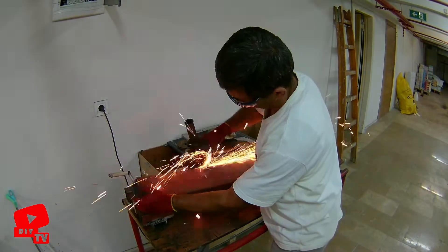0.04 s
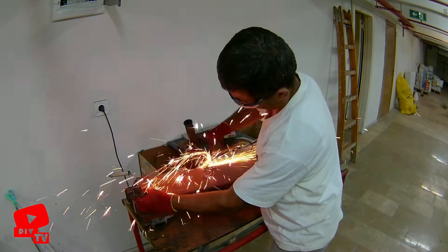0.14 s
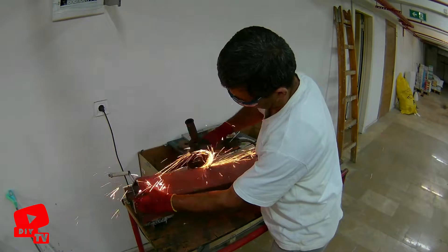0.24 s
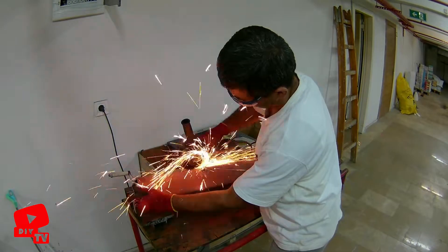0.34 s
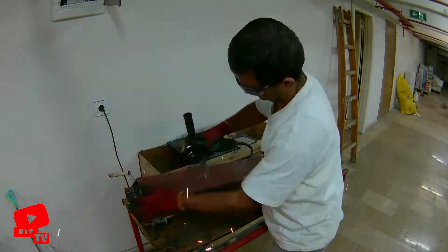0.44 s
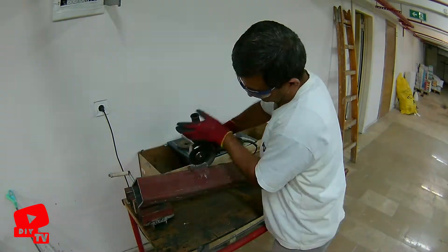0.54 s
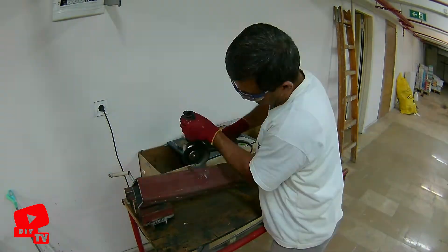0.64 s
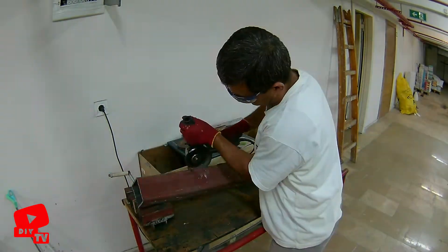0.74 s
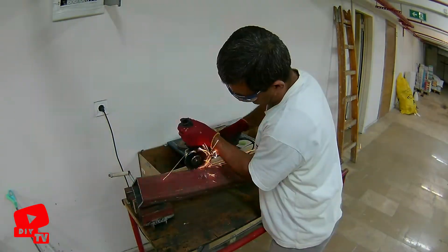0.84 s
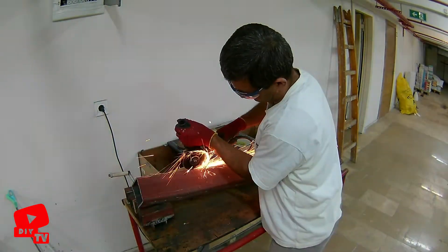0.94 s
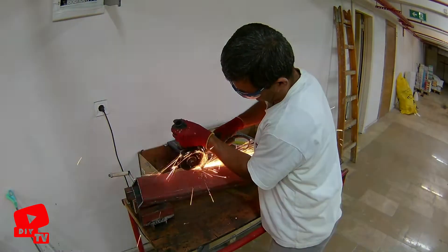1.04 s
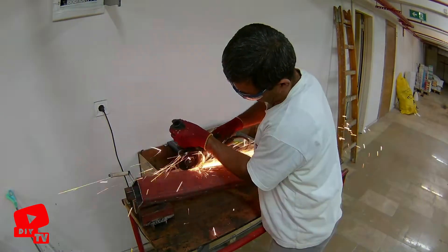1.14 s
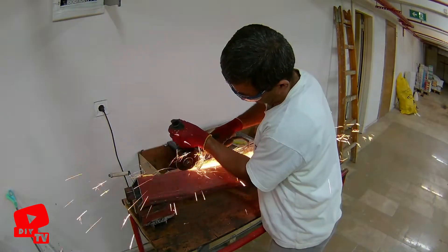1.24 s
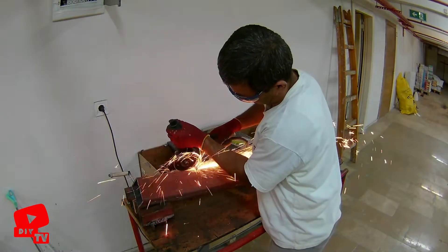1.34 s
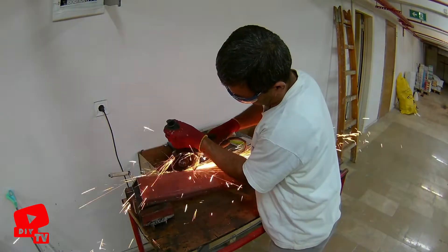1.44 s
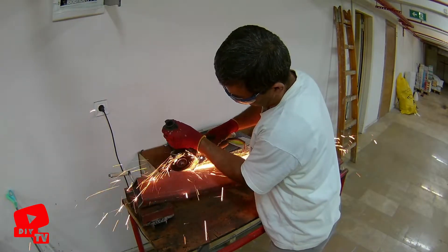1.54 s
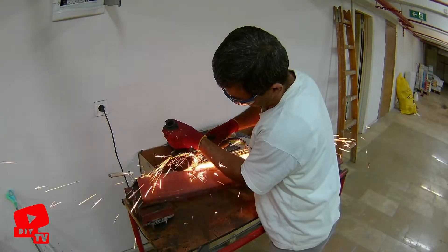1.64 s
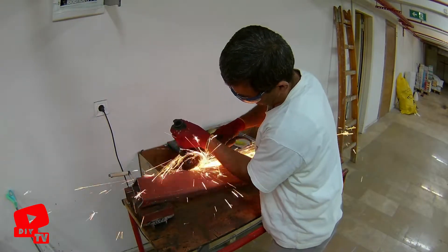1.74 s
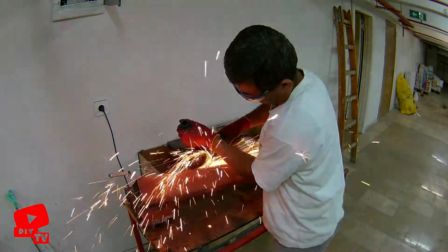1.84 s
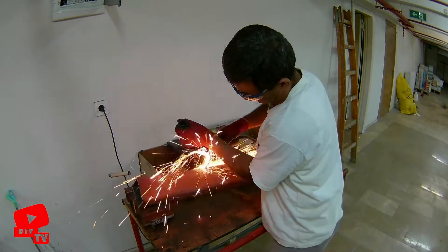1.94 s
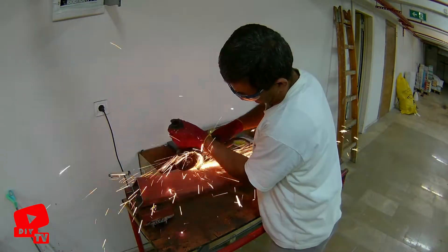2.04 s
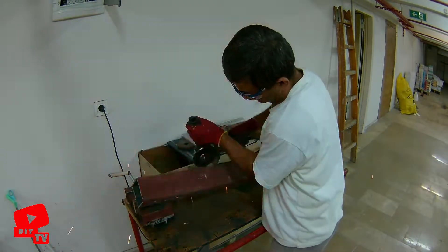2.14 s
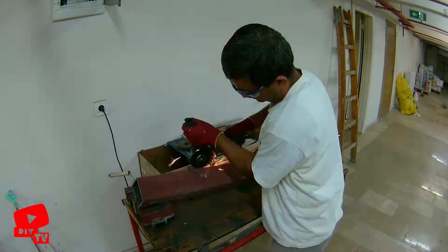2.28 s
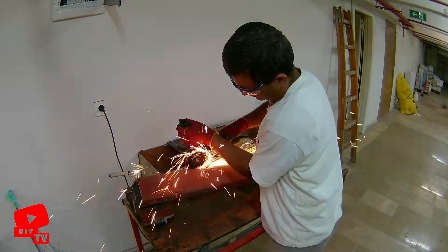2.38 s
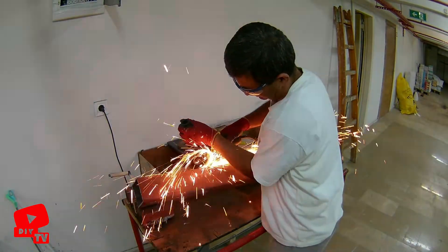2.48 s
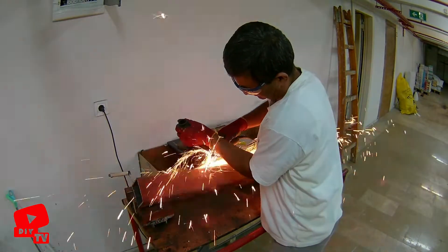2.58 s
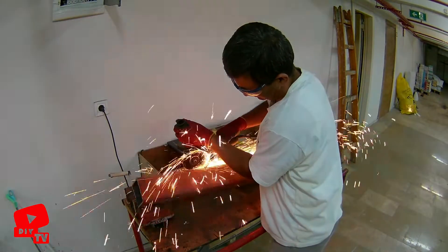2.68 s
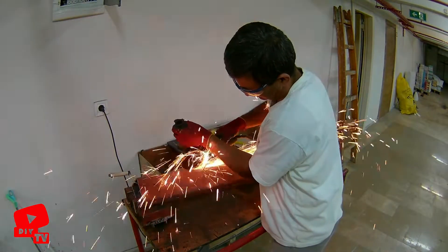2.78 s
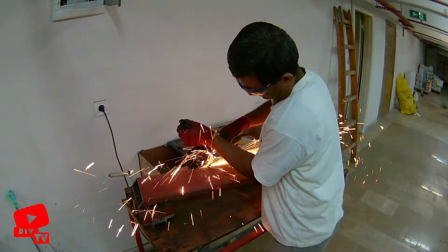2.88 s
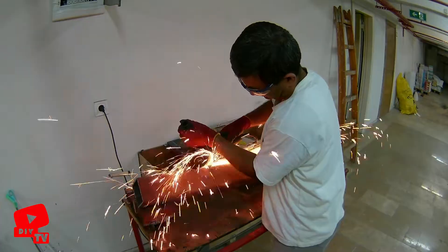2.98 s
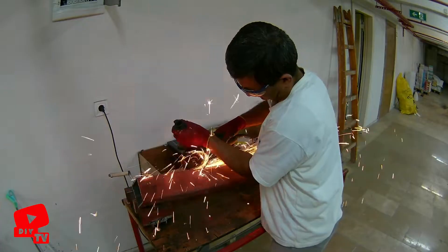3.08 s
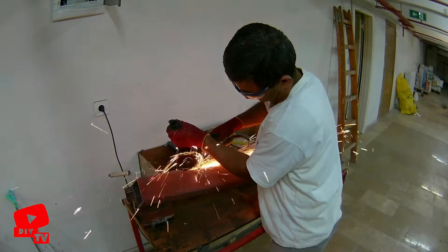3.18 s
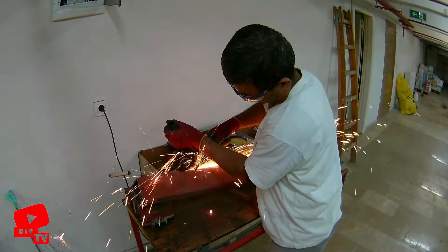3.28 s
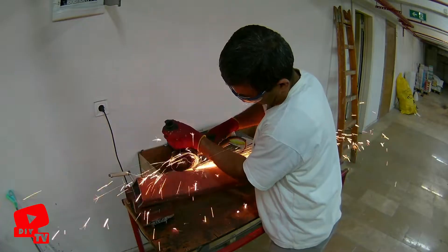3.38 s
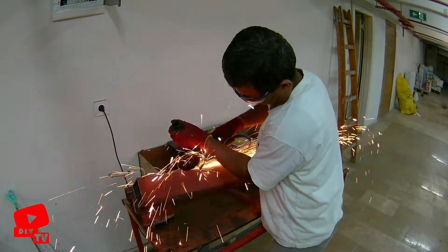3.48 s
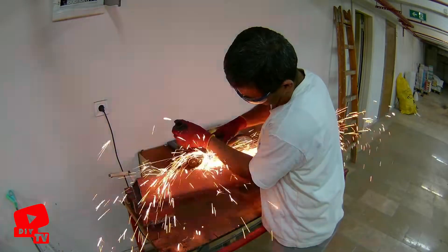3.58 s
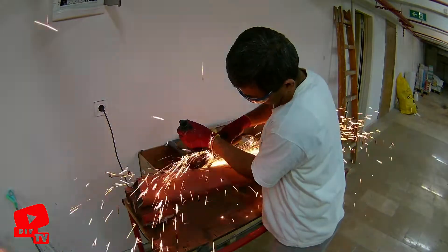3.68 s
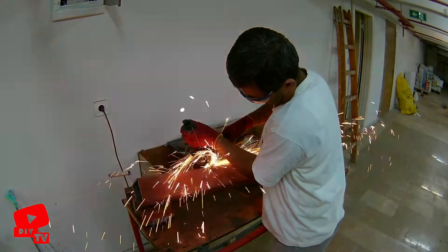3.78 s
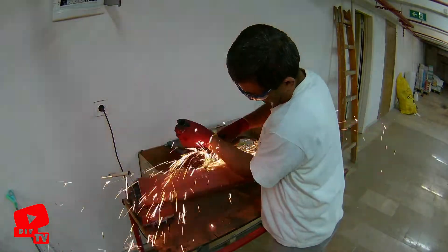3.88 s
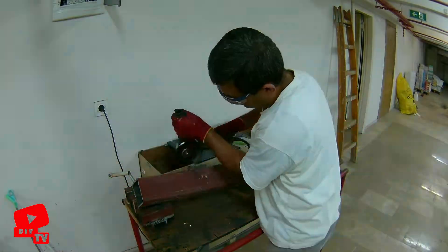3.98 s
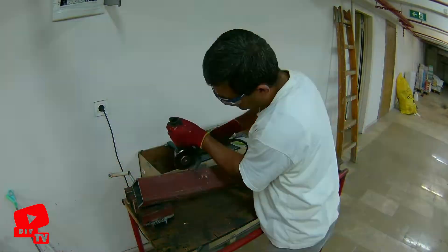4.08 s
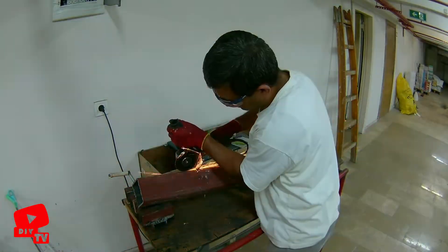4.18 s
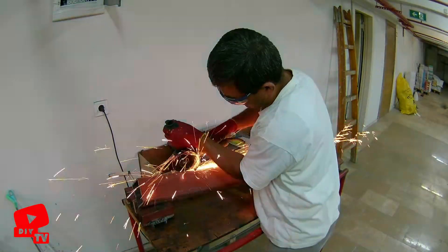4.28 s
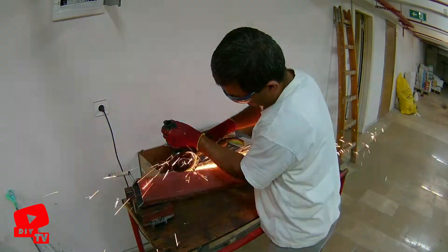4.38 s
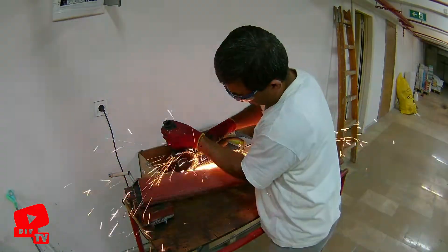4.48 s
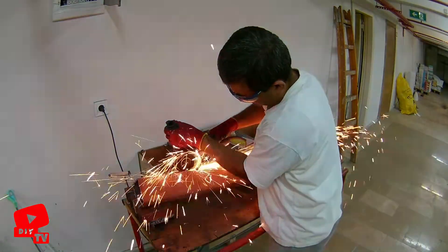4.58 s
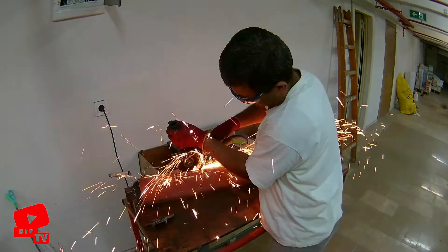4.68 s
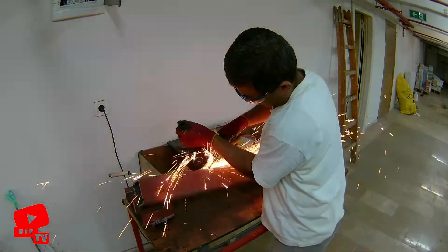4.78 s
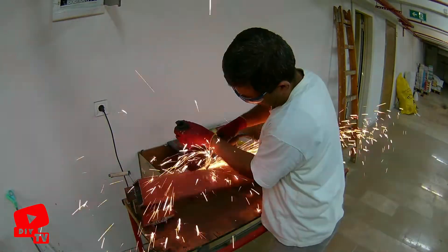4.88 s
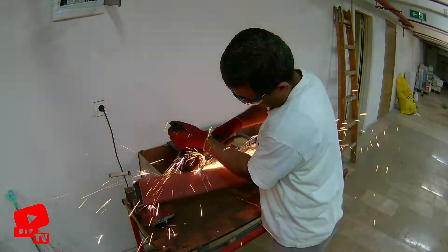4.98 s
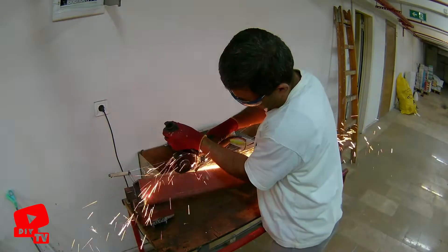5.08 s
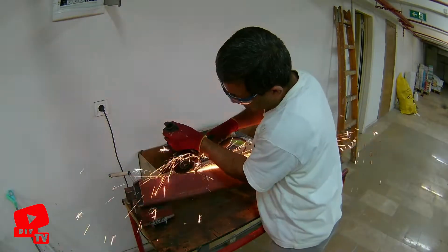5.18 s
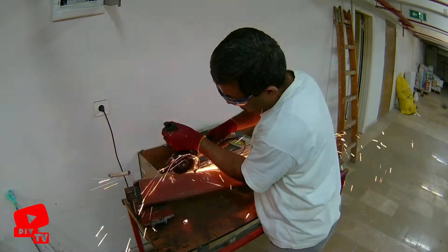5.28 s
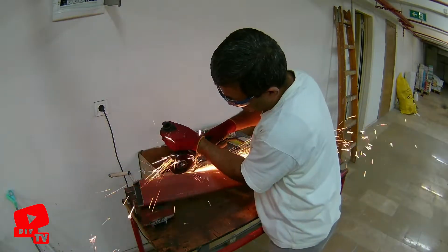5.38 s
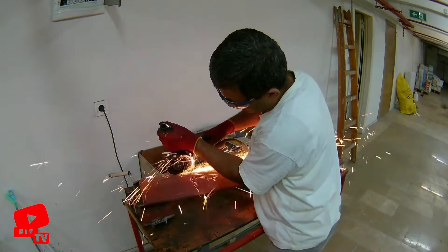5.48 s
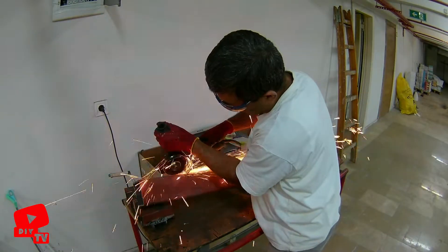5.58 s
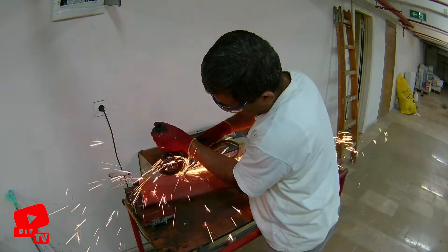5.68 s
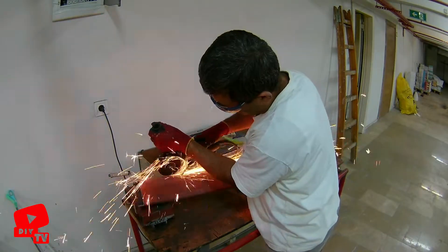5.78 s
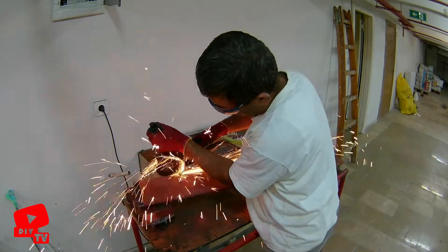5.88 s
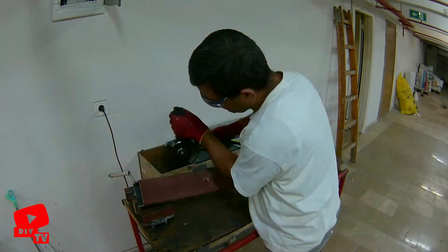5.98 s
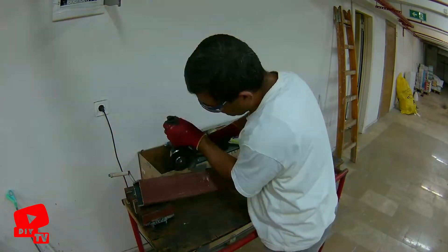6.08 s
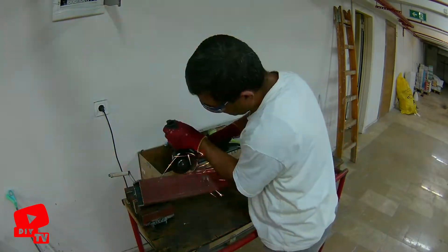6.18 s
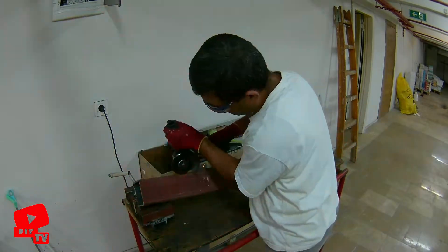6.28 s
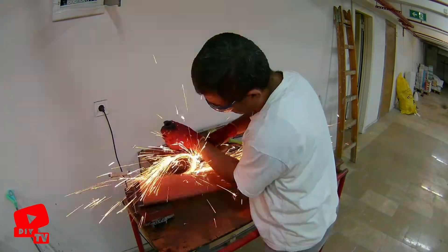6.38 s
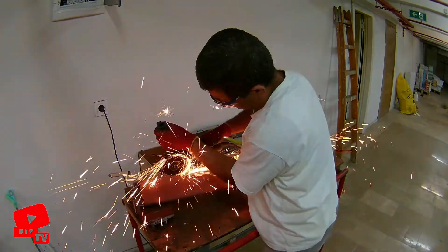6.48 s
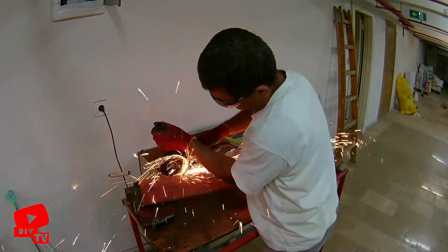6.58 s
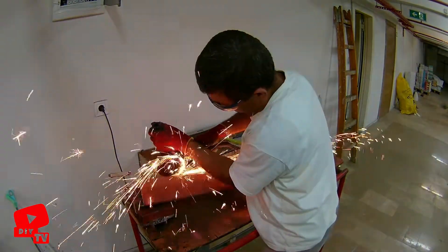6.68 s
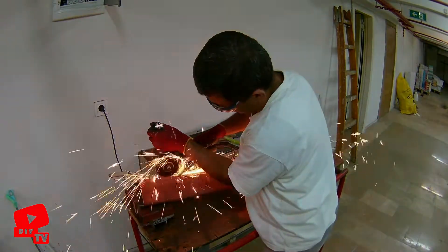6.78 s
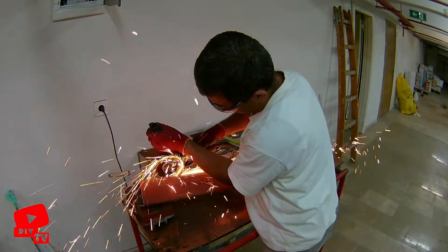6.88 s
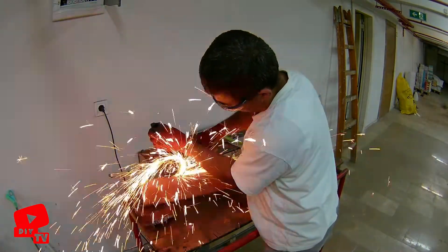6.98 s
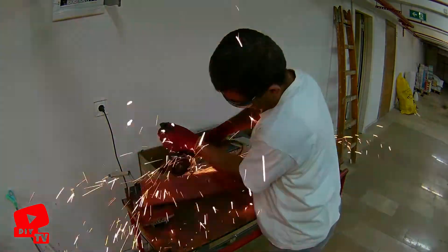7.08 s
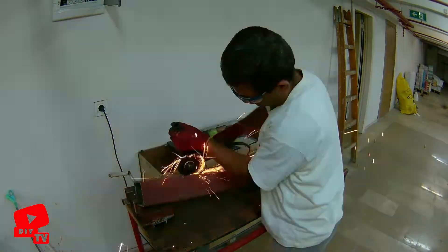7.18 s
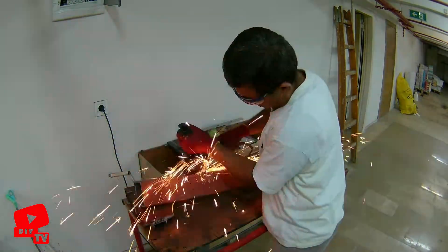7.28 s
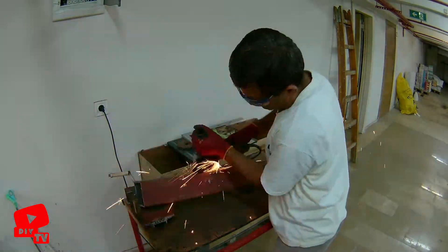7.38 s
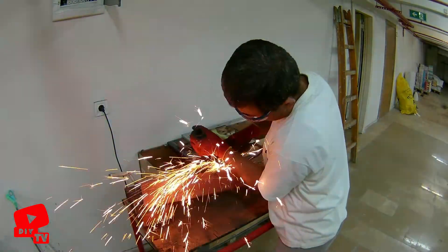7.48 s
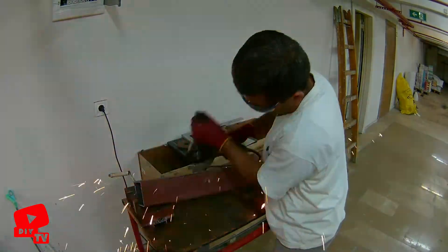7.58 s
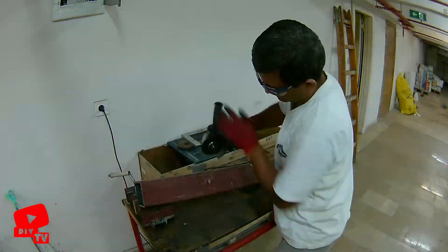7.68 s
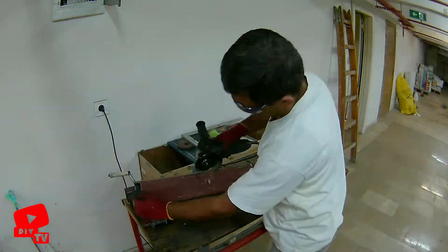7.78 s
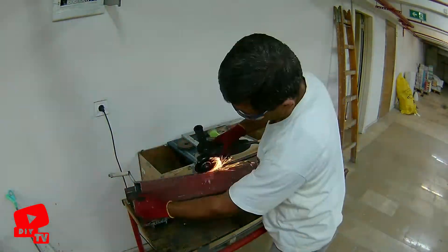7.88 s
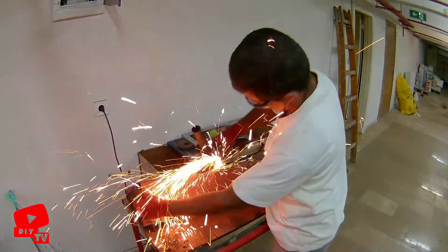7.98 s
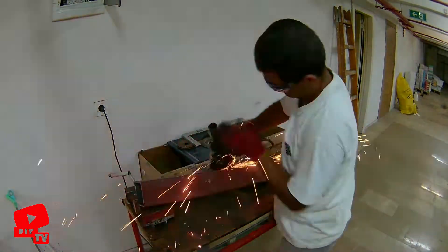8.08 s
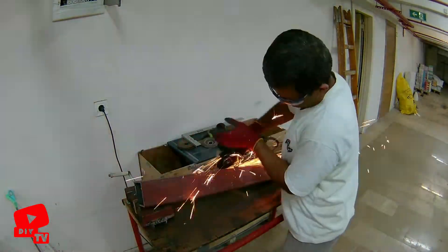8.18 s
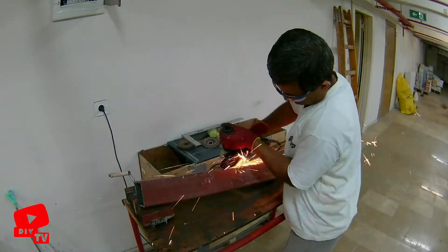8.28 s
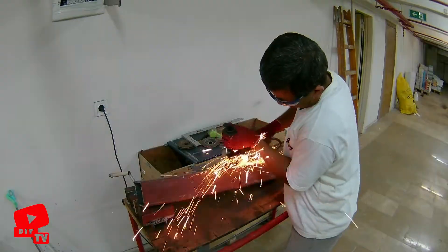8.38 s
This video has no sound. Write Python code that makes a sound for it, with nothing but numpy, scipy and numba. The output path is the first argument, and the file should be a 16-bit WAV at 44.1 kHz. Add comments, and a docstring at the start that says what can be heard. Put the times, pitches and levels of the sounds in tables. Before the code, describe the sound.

An angle grinder bites a steel tube in six quick close passes, harsh buzzing rasp and squeal, whirring up freely between bites in a workshop.

```python
"""Angle grinder on a steel tube

An angle grinder bites into a steel tube in six quick passes, close by in a workshop.
The spindle whirrs up when free and drags down under load. The worn rim repeats every turn (a periodic
source: a buzzing stack of lines), loose grit adds a noisy rasp, and both excite resonances of disc and tube.
Cooling air and a bearing whine fill the pauses, over a faint hum, a low drone and a short room echo."""
import sys
import numpy as np
from scipy import signal
from scipy.fft import rfft, irfft, next_fast_len
from scipy.io import wavfile
from scipy.ndimage import uniform_filter1d, map_coordinates
from numba import njit

SR = 44100
rng = np.random.default_rng(int(sys.argv[2]) if len(sys.argv) > 2 else 0)


def transcribe(signal):
    """Save signal, clipped to [-1, 1], as a 16-bit WAV file at the path in sys.argv[1]."""
    frames = np.atleast_2d(signal).T
    limited = np.clip(frames, -1, 1)
    pcm = np.round(limited * 32767).astype(np.int16)
    wavfile.write(sys.argv[1], SR, pcm)


N = 372204
TIME = np.arange(N) / SR  # s

# Electric hum. Each row: frequency in Hz, mean level in dB.
HUM = [(166.9, -80), (333.8, -86)]
# Low resonances that swell and fade. Each row: frequency in Hz, width in Hz, level in dB.
DRONE = [(241, 22, -83.5), (316, 36, -79.5)]
# Relative spectrum of the cooling air. Each row: frequency in Hz, density in dB per Hz.
AIR_SPECTRUM = [(30, -27), (100, -22.5), (200, -22), (400, -22.5), (900, -25.5), (1400, -19.5), (2200, -12),
                (3400, -2.5), (4600, -6), (6600, 1), (9800, -0.5), (12500, -5), (15500, -2)]
# Pressure on the disc, one curve a pass. Each row: time in s, loss of spindle speed in Hz before inertia.
DRAG = [
    [(0.0, 175.2), (0.128, 205.3), (0.163, 146.5), (0.303, 165.3), (0.432, 226)],
    [(0.87, 28.54), (1.015, 161.3), (1.173, 196.1), (1.731, 207.3), (1.986, 256.8), (2.08, 228.8),
     (2.145, 204)],
    [(2.329, 195), (2.393, 269), (2.529, 293), (2.723, 248.2), (2.852, 188.9), (2.95, 314.4),
     (3.094, 173.3), (3.222, 260), (3.408, 255.7), (3.724, 287), (3.812, 222.8), (3.929, 242.5)],
    [(4.237, 82.9), (4.318, 275.5), (4.465, 236.3), (4.66, 275.1), (4.766, 163.3), (4.858, 256.3),
     (4.997, 243), (5.094, 294.8), (5.307, 177.1), (5.485, 219.4), (5.963, 227.2)],
    [(6.36, 68.3), (6.433, 291.3), (6.6, 216.8), (6.746, 268.4), (7.071, 271.6), (7.152, 211),
     (7.189, 247.2), (7.21, 30.05), (7.46, 83.8), (7.505, 288.1), (7.61, 164.3)],
    [(7.906, 62.1), (7.933, 240.3), (8.152, 124), (8.32, 150.4), (8.44, 298.5)],
]
# Contacts of disc and steel. Each row: start in s, end in s, then in dB the repeating rim over loose grit,
# growl, tube ring, sizzle and knock; each dB value is added to other settings.
PASSES = [(-0.05, 0.418, -5.5, -3, 1, 9.5, 1.5), (0.864, 2.117, -1.5, -16, -2.5, 8, -1),
          (2.308, 3.904, 1, 4.5, 0.5, 7, -1.5), (4.227, 5.927, 1.5, 0.5, 0.5, 7.5, 0),
          (6.34, 7.585, 0, -10, 1, 6.5, 1), (7.905, 8.502, -0.5, -5, 4, 6, 10.5)]
# The rim skims the steel just before a pass. Each row: start in s, end in s, dB against the coming bite.
GRAZES = [(6.244, 6.29, -3.5), (7.851, 7.869, -7)]
# Brief dropouts of the rasp while a few tones carry on. Each row: centre in s, half length in s,
# depth of the hiss in dB, depth of the buzz in dB.
LULLS = [(.897, .014, 12, 7), (1.177, .013, 15, 9), (1.335, .013, 14, 8), (2.15, .012, 9, 4),
         (2.394, .016, 34, 28), (2.5, .01, 8, 0), (3.937, .01, 9, 4), (4.333, .012, 9, 2),
         (4.473, .014, 12, 3), (4.95, .018, 32, 14), (5.76, .015, 34, 10), (6.168, .011, 6, 2),
         (7.025, .013, 13, 4), (7.35, .009, 11, 4), (7.635, .015, 12, 7)]
# Once-a-turn throb, one curve a pass. Each row: time in s, level in dB before THROB_TRIM_DB and contact.
THROB = [
    [(0.0, -59), (0.204, -62), (0.236, -68), (0.378, -53.5), (0.684, -70), (0.8, -63)],
    [(0.92, -64), (0.982, -62), (1.7, -65), (1.898, -69), (1.98, -56), (2.05, -70)],
    [(2.42, -62.5), (2.756, -73), (2.876, -52), (3.072, -64), (3.106, -53.5), (3.808, -71), (3.846, -62),
     (3.95, -64)],
    [(4.1, -66), (4.234, -57), (4.516, -53.5), (4.73, -77), (4.854, -50), (5.208, -68), (5.324, -54),
     (5.97, -64)],
    [(6.2, -75), (6.248, -52), (6.3, -74), (6.404, -56), (7.002, -67), (7.39, -58), (7.456, -47),
     (7.65, -69)],
    [(7.92, -62), (7.938, -55), (7.974, -53), (8.002, -65), (8.028, -52.5), (8.242, -58), (8.318, -62),
     (8.35, -89)],
]
# Coarse bursts as the rim snags. Each row: centre in s, half length in s, peak level in dB.
SNAGS = [(3.529, 0.02, -38), (5.213, 0.095, -41.5), (6.435, 0.011, -43), (6.957, 0.034, -44),
         (7.323, 0.024, -41), (7.557, 0.027, -42)]
# Single modes that catch and flare. Each row: centre in s, half length in s, frequency in Hz, level in dB.
SCREAMS = [(0.12, 0.062, 1212, -48.5), (0.152, 0.028, 1584, -42), (0.335, 0.041, 1590, -46),
           (0.337, 0.023, 6400, -38), (0.354, 0.033, 5180, -36), (1.005, 0.014, 5420, -39),
           (1.05, 0.031, 1216, -48), (1.408, 0.17, 11320, -30.5), (1.5, 0.099, 1847, -45.5),
           (1.605, 0.19, 6500, -41.5), (1.722, 0.034, 11320, -23.5), (1.793, 0.0095, 8268, -26),
           (1.966, 0.069, 5500, -35), (1.968, .07, 3180, -48), (1.7, .05, 3943, -47),
           (1.996, 0.12, 4590, -43), (2.03, 0.057, 10335, -38), (2.39, 0.016, 8120, -25),
           (2.391, 0.017, 12070, -27), (2.455, 0.029, 6440, -35.5), (2.484, 0.012, 4560, -30),
           (2.627, 0.11, 1650, -42), (2.804, 0.021, 4627, -37), (2.99, .025, 5624, -34),
           (3.362, 0.057, 3591, -42), (3.6, 0.035, 3877, -39), (3.669, 0.14, 1624, -43),
           (3.718, 0.025, 4640, -31.5), (4.705, 0.032, 1218, -39.5), (4.968, 0.015, 2730, -38),
           (4.952, .018, 3630, -37.5), (4.969, 0.019, 1345, -40), (4.95, 0.028, 898, -45),
           (4.951, 0.023, 4630, -36), (4.952, 0.021, 11540, -27), (4.954, 0.014, 7770, -32),
           (4.99, 0.034, 6350, -26), (5.19, 0.05, 1718, -42), (5.21, 0.053, 887, -46),
           (5.194, 0.026, 3050, -37.5), (5.299, 0.048, 2304, -41), (5.763, 0.014, 4230, -39),
           (5.745, 0.011, 1830, -39), (5.739, 0.012, 3050, -41), (5.84, 0.055, 5230, -40.5),
           (5.624, .03, 3865, -40.5), (6.802, 0.065, 881, -47.5), (6.984, 0.022, 3830, -38.5),
           (7.02, 0.02, 6380, -37), (7.148, .01, 4640, -37), (7.23, 0.015, 6310, -36),
           (7.132, 0.016, 914.5, -43.5), (7.155, 0.012, 2290, -33.5), (7.188, 0.048, 1845, -39),
           (7.331, 0.035, 1210, -43), (7.552, 0.016, 2300, -40), (8.055, .035, 6348, -32),
           (8.238, 0.03, 6290, -34), (8.242, 0.029, 4580, -34)]
# Guard and bench resonances for the knock. Each row: frequency in Hz, width in Hz, dB against the rasp.
BODY = [(497, 51, -10), (646, 56, -8), (878.5, 83, -6), (1323, 143.4, -14)]
# The tube's strongest modes. Each row: frequency at time zero in Hz, width in Hz, dB against the rasp,
# steady fall of frequency in Hz per s.
SINGING = [(1216, 21, -8, 0.5), (1614, 59, -12.5, -1), (1706, 23, -15.5, 2.5), (1856, 4.6, -8.5, 0),
           (2330, 52, -8, 1), (4615, 35, -4, 0.5), (6462, 44, 3.5, 18)]
# Lesser modes of the tube. Each row: frequency in Hz, width in Hz, relative level in dB.
TUBE = [(3075, 40, -3), (3595, 20, -4), (3865, 20, -4), (6663, 25, 6), (8500, 45, 4), (8857, 25, 2),
        (9658, 30, 1), (10349, 30, -2), (11047, 20, 0), (11325, 25, 6), (12020, 30, 1)]
# Band levels, one curve a pass. Each row: time in s, rasp near 3 kHz in dB, band of the lower disc
# resonance in dB, band of the upper one in dB.
BITE = [
    [(0.0, -43.5, -30.5, -28), (0.074, -42.5, -33.5, -29.5), (0.354, -46, -30.5, -27),
     (0.42, -43, -37, -29)],
    [(0.91, -45, -31.5, -32.5), (0.966, -44.5, -28, -34), (1.212, -42.5, -31.5, -25.5),
     (1.242, -43.5, -31.5, -36), (1.354, -44, -33.5, -29), (1.758, -43, -32, -25.5),
     (1.778, -45, -31.5, -28.5), (2.12, -43, -26.5, -26)],
    [(2.34, -45, -27.5, -26), (2.598, -40, -30, -30), (2.834, -42, -36, -35.5), (2.86, -43, -32.5, -26.5),
     (3.248, -42, -30, -32.5), (3.366, -42.5, -39, -34), (3.672, -40.5, -25.5, -28.5),
     (3.892, -44, -35.5, -30.5), (3.91, -40, -23, -25)],
    [(4.26, -42.5, -32, -30.5), (4.314, -41.5, -30, -28.5), (4.624, -43, -35, -36),
     (4.81, -41.5, -30.5, -27.5), (5.332, -43.5, -36.5, -35), (5.42, -44, -39, -30),
     (5.498, -41.5, -33.5, -28), (5.812, -43.5, -35, -33.5), (5.92, -43, -34, -31)],
    [(6.37, -45, -34.5, -32), (6.468, -42, -30.5, -27), (6.546, -45, -41, -27), (6.62, -43.5, -35, -30.5),
     (6.988, -43, -38.5, -38.5), (7.022, -43, -35, -32), (7.088, -44.5, -42, -28), (7.1, -39.5, -30, -28),
     (7.15, -40, -36, -30), (7.184, -46, -40, -35), (7.3, -40.5, -35, -29), (7.365, -42.5, -33, -29.5),
     (7.4, -45, -35, -39), (7.46, -45, -36, -31), (7.535, -43, -34, -25), (7.59, -42.5, -35, -28.5)],
    [(7.93, -42, -36.5, -29), (8.242, -42, -35.5, -32.5), (8.392, -48, -33, -27), (8.42, -46, -37, -31)],
]
# Disc resonances shift with the point of contact, one curve a pass.
# Each row: time in s, lower resonance in Hz, upper resonance in Hz.
CONTACT = [
    [(0.0, 8430, 11900), (0.2, 8070, 11600), (0.244, 8560, 12400), (0.43, 8100, 11500)],
    [(0.9, 7660, 11690), (0.95, 8180, 11530), (1.748, 8170, 11100), (1.866, 8530, 12600),
     (1.974, 8490, 12350), (2.068, 8230, 11100), (2.13, 8170, 11900)],
    [(2.33, 8700, 11800), (2.532, 8730, 12200), (2.87, 7800, 11300), (2.94, 8640, 12500),
     (3.108, 8053, 11340), (3.508, 8000, 11500), (3.92, 8724, 12880)],
    [(4.25, 7800, 11320), (4.366, 8450, 11790), (5.002, 8204, 11350), (5.134, 9030, 12900),
     (5.494, 7960, 11110), (5.93, 7920, 11160)],
    [(6.36, 8270, 11620), (6.728, 8270, 11280), (6.774, 8320, 12610), (7.326, 8560, 11800),
     (7.388, 7695, 11810), (7.502, 8960, 12570), (7.6, 8440, 12380)],
    [(7.92, 8210, 11720), (7.992, 8700, 12100), (8.194, 7780, 11960), (8.44, 8920, 12660)],
]
# Filter on the rim's lines, weakest near 1500 Hz. Each row: frequency in Hz, gain in dB.
RIM_FILTER = [(1340, -3), (1430, -6), (1500, -17), (1600, -4), (1750, -2), (2400, -3.5), (3500, -4.5),
              (4800, -6), (5400, -4), (6800, -1), (8000, 0)]
# Relative spectrum of the rasp. Each row: frequency in Hz, gain in dB.
RASP_SPECTRUM = [(100, -30), (380, -19), (700, -12.5), (1000, -7.5), (1130, -9), (1280, 2.5), (1400, 1.5),
                 (1500, -0.5), (1700, 1), (2050, 0.5), (2500, -0.5), (3100, 1.5), (3700, -1.5), (4500, 5.5),
                 (4900, 3), (5350, 6.5), (5900, 0.5), (7200, 4.5), (10000, 5.5), (13300, -2), (16000, -7)]

FREE_HZ, WORKING_HZ, INERTIA_S = 697, 460, 0.075  # unloaded speed, reference speed for the growl
ATTACK_S, RELEASE_S = 0.027, 0.021
AIR_DB = -39.5
BEARING_ORDER = 3.725  # whine cycles per turn
WHINE_DB, LOADED_WHINE_DB = -59.5, -70  # part that follows speed, at full speed; part that does not
HOUSING_HZ, HOUSING_DB = 1213, -63.5
THROB_TRIM_DB, FREE_THROB_DB = -0.5, -8  # the second applies off the steel
SNAG_HZ, SNAG_WIDTH_HZ = 1990, 1900
IDLE_KNOCK_DB = -56
RING_ON_S, SWELL_DB = 0.04, 4.2
FLASH_HZ, TOP_RATIO = 5400, 1.486  # lowest disc voice; top disc voice over the lower resonance
CROWD_DB = -9
RASP_DB, GROWL_DB, SIZZLE_DB, TUBE_DB = 13, -13, -6, 18.5
GROWL_GRIT_DB = -5
GROWL_DB_PER_HZ = -0.017  # the growl weakens with each turn per second lost
SKID_DB, SKID_S = 2, 0.53  # the repeating rim stands out most at the start of a pass
EVEN_DB_PER_DB = 1.02  # a disc that squeals over its rasp runs more evenly
TOP_HZ = 15750


def undb(db):
    """Amplitude is ten to the power of the decibels over twenty."""
    return 10 ** (np.asarray(db) / 20)


def curves(table):
    """Linear interpolation carries each column of timed rows to every sample."""
    seconds, *columns = np.transpose(table)
    return [np.interp(TIME, seconds, column) for column in columns]


def along(passes):
    """Interpolation joins the curves of all passes into one."""
    return curves([row for curve in passes for row in curve])


def unit(x):
    """Normalisation: scale to a standard deviation of 1."""
    return x / np.std(x)


def steady(x, size=4000):
    """Level compression: a running rms of 1 removes slow swells and keeps the fast flutter."""
    power = uniform_filter1d(uniform_filter1d(x * x, size), size)
    return x / np.sqrt(power + 1e-12)


def walk(rate):
    """Random modulation: lines join chance knots, rate of them a second, with spread 1."""
    at = TIME * rate
    knots = rng.standard_normal(8192)
    i = at.astype(int) % 8191
    return unit(knots[i] + (knots[i + 1] - knots[i]) * (at % 1))


def lag(x, seconds):
    """First-order relaxation: follow x with a time constant."""
    keep = np.exp(-1 / (SR * seconds))
    return signal.lfilter([1 - keep], [1, -keep], x, zi=[keep * x[0]])[0]


def colour(x, points):
    """Linear filtering in the frequency domain, by (Hz, dB) points on a logarithmic axis."""
    hz, db = np.transpose(points)
    size = next_fast_len(N)
    f = np.maximum(np.fft.rfftfreq(size, 1 / SR), 1)
    gain = undb(np.interp(np.log(f), np.log(hz), db))
    return irfft(rfft(x, size) * gain, size)[:N]


@njit
def svf(x, hz, width):
    """Damped oscillator: a state-variable band-pass with moving centre and gain 1 there."""
    y, b, l = np.empty(len(x)), 0., 0.
    for i in range(len(x)):
        g = np.tan(np.pi * hz[i] / SR)
        k = np.pi * width / SR * (1 + g * g) / g
        v = (b + g * (x[i] - l)) / (1 + g * (g + k))
        b, l, y[i] = 2 * v - b, l + 2 * g * v, k * v
    return y


def ring(x, hz, width_hz):
    """One resonance, fixed or moving, selects its own band from the excitation."""
    return svf(x, np.minimum(hz * np.ones(N), .45 * SR), float(width_hz))


def decaying_noise(t60_s, size):
    """Exponential decay: noise that loses 60 dB in t60_s, cut off after size samples."""
    t = np.arange(size) / SR
    return t, rng.standard_normal(size) * np.exp(-np.log(1000) * t / t60_s)


def above(db, under_db, least_db=-9):
    """Power subtraction: gain of the part of a level that stands above another sound, with a floor."""
    return np.sqrt(np.maximum(undb(db) ** 2 - undb(under_db) ** 2, undb(db + least_db) ** 2))


def bell(s, half):
    """A Gaussian envelope raises a brief event and lets it die."""
    return np.exp(-((TIME - s) / half) ** 2 / 2)


def background():
    """Wavering sine tones make the electric hum; noise through narrow resonances makes the drone."""
    hum = 0
    for hz, db in HUM:
        hum = hum + np.sqrt(2) * undb(db + 1.2 * walk(7)) * np.sin(2 * np.pi * hz * TIME)
    drone = 0
    for hz, width, db in DRONE:
        tone = ring(ring(rng.standard_normal(N), hz, width), hz, 3 * width)
        drone = drone + unit(tone * undb(3 * walk(12))) * undb(db)
    return hum + drone


def workshop(x, t60_s=0.24, wet_db=-10, size=6000):
    """Reverberation: the near wall and the bench add a short, dense echo, as decaying noise."""
    t, tail = decaying_noise(t60_s, size)
    tail = tail * (t > .002)  # the echo sets in after 2 ms
    return undb(wet_db) * signal.fftconvolve(x, tail / np.linalg.norm(tail))[:N]


def lulls():
    """Brief attenuation: gains of the hiss and of the buzz through the gaps."""
    s, half, *depths = np.transpose(LULLS)
    shapes = np.exp(-np.minimum(((TIME - s[:, None]) / half[:, None]) ** 2, 10) ** 2)
    return undb(-np.array(depths) @ shapes)


def spindle():
    """Rotational inertia: pressure drags the motor down, every change is smoothed and load adds waver."""
    pressure = sum(np.interp(TIME, *np.transpose(curve), left=0, right=0) for curve in DRAG)
    drag = lag(pressure, INERTIA_S)
    return (FREE_HZ - drag) * (1 + (.0006 + .001 * drag / 250) * walk(90))


def motor(turns, hz, gap):
    """Turbulence gives the air noise, rotation a bearing whine loudest at full speed, the housing a steady tone."""
    speed_db = 20 * np.log10(hz / FREE_HZ)
    air = unit(colour(rng.standard_normal(N), AIR_SPECTRUM))
    air = air * undb(AIR_DB + 0.054 * speed_db + .5 * walk(30))  # almost independent of speed
    whine = np.sin(2 * np.pi * BEARING_ORDER * turns + .45 * walk(70)) * undb(2.5 * walk(30))
    whine = whine * (undb(WHINE_DB + 3.5 * speed_db) + undb(LOADED_WHINE_DB))
    housing = np.sqrt(2) * np.sin(2 * np.pi * HOUSING_HZ * TIME + .5 * walk(15))
    housing = housing * undb(HOUSING_DB + 2 * walk(10))
    return (air + whine) * gap + housing * np.sqrt(gap)


def touch(start, end):
    """Contact force builds linearly, holds and decays exponentially as the disc lifts."""
    return np.clip((TIME - start) / ATTACK_S, 0, 1) * np.exp(-np.maximum(TIME - end, 0) / RELEASE_S)


def rim(turns, wear_rate=16, uneven_db=2, size=256, count=39):
    """Periodicity: the rim's bumps return on every turn and slowly wear into new ones; a few spacings stand out."""
    chance = rng.standard_normal((400, count, 3))
    shapes = (chance[..., 0] + 1j * chance[..., 1]) * undb(uneven_db * chance[..., 2])
    shapes[:, :3] = 0  # no lines at zero, one or two cycles a turn
    profiles = irfft(shapes, size, axis=1)
    place = [TIME * wear_rate, turns % 1 * size]  # wear_rate profiles a second
    return unit(map_coordinates(profiles, place, order=1, mode="grid-wrap"))


def grit(turns, pulsing=0.61, grain_db=2):
    """Modulated noise: grains tear off at random, surging as the high side of the disc comes round."""
    sizes = undb(grain_db * np.repeat(rng.standard_normal(N // 16 + 1), 16)[:N])
    surge = 1 + pulsing * np.cos(2 * np.pi * turns)
    return unit(rng.standard_normal(N) * sizes * surge)


def steel(x, t60_s=0.09, size=4000):
    """Modal density: the tube's crowd of short-lived modes breaks gliding lines into flashes."""
    _, tail = decaying_noise(t60_s, size)
    return unit(x + signal.fftconvolve(x, tail / np.linalg.norm(tail))[:N])


def throb(turns, contact):
    """Imbalance: the out-of-true disc shakes the tool once a turn, a wavering line that follows the grip."""
    line = np.sin(2 * np.pi * turns + .6 * walk(55)) * undb(3 * walk(35))
    level = undb(THROB_TRIM_DB + along(THROB)[0])
    return steady(line, size=5000) * level * np.maximum(contact, undb(FREE_THROB_DB))


def wobble(turns, push, flutter_db=3.0):
    """Forced vibration: knocks two and, weakly, three times a turn swell as they slide through resonances."""
    knock = undb(7.5) * rng.standard_normal(N)  # irregular part
    for order, db in ((2, -1.5), (3, -9)):
        line = np.sin(2 * np.pi * order * turns + .35 * walk(70))
        knock = knock + undb(flutter_db * walk(30) + db) * line
    body = sum(undb(db) * ring(ring(knock, hz, width), hz, 2 * width) for hz, width, db in BODY)
    return body * (push + undb(IDLE_KNOCK_DB))


def snags(turns):
    """Filtered noise: coarse grains crunch through the guard in short bursts."""
    grains = grit(turns, pulsing=0.42, grain_db=-7)
    crunch = ring(ring(grains, SNAG_HZ, SNAG_WIDTH_HZ), SNAG_HZ, SNAG_WIDTH_HZ)
    bursts = sum(undb(db) * bell(s, half) for s, half, db in SNAGS)
    return unit(crunch * undb(2.9 * walk(130))) * bursts


def crowd(push, low_hz=1900, high_hz=7200, count=44):
    """Impulse response: random kicks set each of many weak tube modes ringing for some hundredths of a second."""
    out = 0
    for hz in np.linspace(low_hz, high_hz, count) * (1 + .01 * rng.standard_normal(count)):
        kicks = rng.standard_normal(N) * (rng.random(N) < 25 / SR)  # about 25 a second
        out = out + ring(ring(kicks, hz, 28), hz, 120)
    return unit(out) * push * undb(CROWD_DB)


def singing(force, push):
    """Energy storage: the tube's strongest modes follow the rasp, flare by chance and ring on after the disc lifts."""
    drive = np.sqrt(lag(push ** 2, RING_ON_S))
    out = 0
    for hz, width, db, fall in SINGING:
        centre = hz - fall * TIME
        flare = undb(SWELL_DB * (np.minimum(walk(8 + hz / 130), 1.1) - .6))
        tone = steady(ring(ring(force, centre, width), centre, 4 * width))
        out = out + tone * undb(db) * flare
    return out * drive


def screams(bumps, width_share=0.007):
    """High-Q resonance: single modes of the tube, guard or disc flare up for a moment, flutter and die."""
    out, flutter = np.zeros(N), undb(2.5 * walk(75) - .7)
    for s, half, hz, db in SCREAMS:
        near = np.abs(TIME - s) < 3 * half
        centre, width = np.full(near.sum(), float(hz)), width_share * hz
        tone = steady(svf(svf(bumps[near], centre, width), centre, 4 * width), size=800)
        out[near] += tone * undb(db) * bell(s, half)[near]
    return out * flutter


def squeal(bumps, lower, upper):
    """Selective resonance: the disc picks out rim lines sliding through it; the lowest voice is fixed and flickers."""
    lower_hz, upper_hz = along(CONTACT)
    flashes = undb(np.minimum(-22 + 7 * walk(50), -13))
    voices = [(FLASH_HZ, 200, lower * flashes),  # centre in Hz, width in Hz, gain
              (lower_hz, 440, lower * undb(-1.0)),
              (upper_hz, 700, upper * undb(-8.0)),
              (TOP_RATIO * lower_hz, 1300, upper * undb(-11.5))]
    out = 0
    for centre, width, gain in voices:
        tone = steady(ring(ring(bumps, centre, width), centre, 4 * width), size=1000)
        out = out + tone * gain * undb(1.9 * walk(65))
    return out


def grinding(turns, hz, gap, buzz_gap):
    """Source and resonators: rim and grit scrape the steel and excite rasp, growl, squeal, sizzle and tube."""
    contact = sum(touch(start, end) for start, end, *_ in PASSES)
    contact = contact + sum(undb(db) * touch(start, end) for start, end, db in GRAZES)
    skid = sum((TIME > start) * np.exp(-np.abs(TIME - start) / SKID_S) for start, *_ in PASSES)
    rasp_db, lower_db, upper_db = along(BITE)
    pass_rows = [(s, *rest) for start, end, *rest in PASSES for s in (start, end)]
    even_db, growl_db, ring_db, sizzle_db, knock_db = curves(pass_rows)

    # balance of the periodic rim against the random grit
    squeal_over_rasp_db = (lower_db + upper_db) / 2 - rasp_db - 6.5
    even = undb(even_db + SKID_DB * skid + EVEN_DB_PER_DB * squeal_over_rasp_db)
    bumps = steel(colour(rim(turns), RIM_FILTER)) * even
    grains = grit(turns) * gap
    chatter = undb(0.64 * walk(60)) / np.sqrt(1 + even ** 2)
    force = (undb(-4) * bumps * buzz_gap * gap ** 0.031 + grains) * chatter
    regular = (bumps + undb(-8) * grains) * chatter  # mostly rim

    push = contact * above(rasp_db, under_db=-46.5)
    rasp = undb(RASP_DB) * unit(colour(force, RASP_SPECTRUM)) * push
    growl = unit(ring(ring(regular + undb(GROWL_GRIT_DB) * grains, 1400, 690), 2160, 1200))
    growl = growl * push * undb(GROWL_DB + growl_db + GROWL_DB_PER_HZ * (WORKING_HZ - hz))
    sizzle = unit(ring(ring(force, 14880, 1400), 18600, 2600))
    sizzle = sizzle * undb(SIZZLE_DB + sizzle_db + (upper_db + rasp_db) / 2)
    strike = (grains + force) * push / 2
    tube = undb(TUBE_DB) * sum(undb(db) * ring(ring(strike, mode_hz, width), mode_hz, mode_hz / 10)
                               for mode_hz, width, db in TUBE)
    disc = squeal(regular, above(lower_db, rasp_db + 5), above(upper_db, rasp_db + 5)) * buzz_gap ** .5

    tones = growl + tube + crowd(push) * gap
    tones = tones + singing(force, push * undb(ring_db)) + wobble(turns, push * undb(knock_db))
    scrape = rasp + (disc + sizzle) * contact + tones * buzz_gap
    return scrape + screams(regular) + throb(turns, contact) * buzz_gap ** 2.6 + snags(turns)


def scene():
    """Superposition: grinder, room echo and background add up, alike in both channels."""
    hz = spindle()
    turns = np.cumsum(hz) / SR
    gap, buzz_gap = lulls()
    tool = grinding(turns, hz, gap, buzz_gap) + motor(turns, hz, gap)
    return np.tile(tool + (workshop(tool) + background()) * gap, (2, 1))


def record(dry):
    """Band limiting: a steep elliptic low-pass cuts the top."""
    return signal.sosfilt(signal.ellip(12, .1, 90, TOP_HZ, fs=SR, output="sos"), dry)


dry = scene()
out = record(dry)
transcribe(out)
```